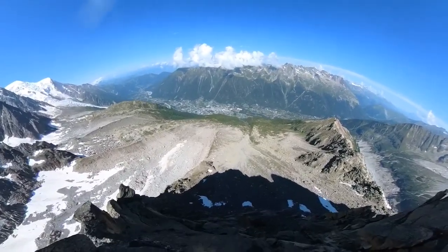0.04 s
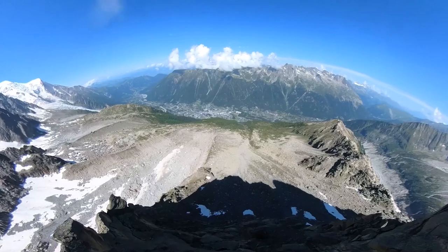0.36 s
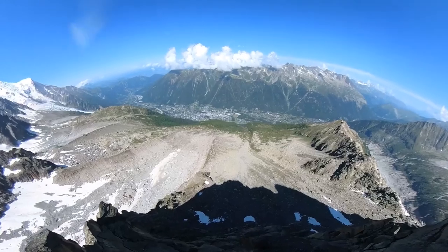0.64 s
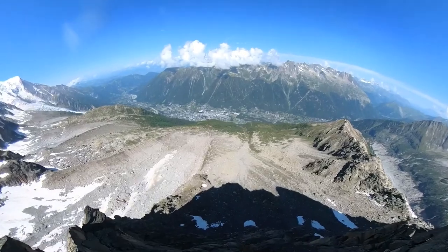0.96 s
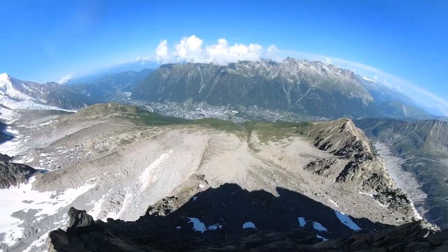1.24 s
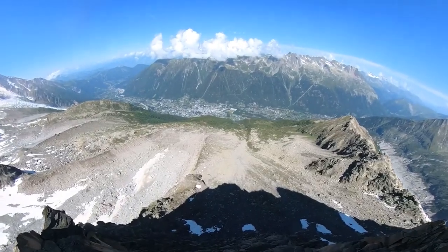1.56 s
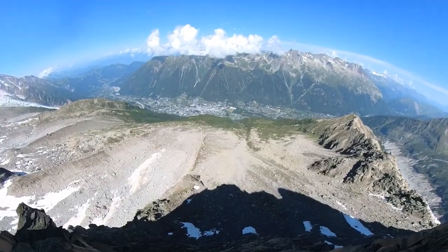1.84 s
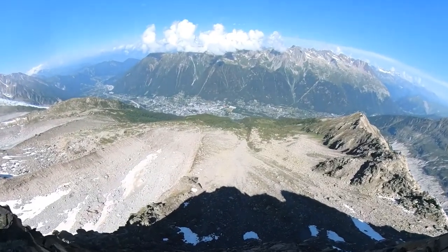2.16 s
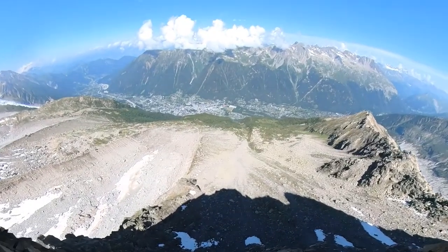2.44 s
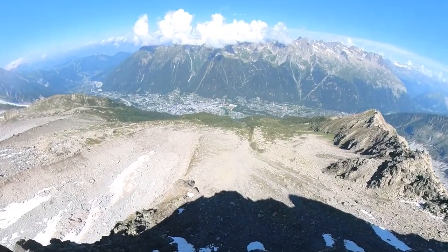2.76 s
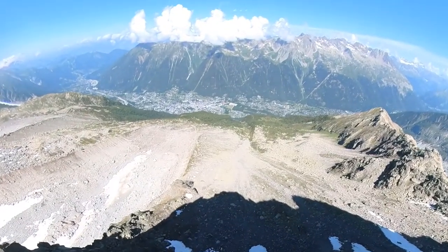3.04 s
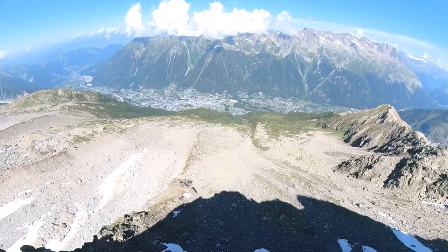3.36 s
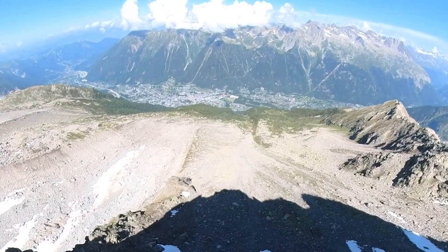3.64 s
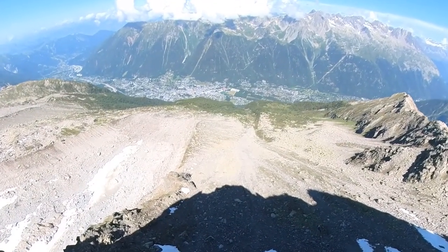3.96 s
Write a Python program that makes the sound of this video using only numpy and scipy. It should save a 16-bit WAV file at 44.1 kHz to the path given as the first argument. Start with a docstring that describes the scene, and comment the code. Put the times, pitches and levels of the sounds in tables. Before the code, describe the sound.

Muffled wind buffets a body-worn microphone in the left channel, with a brief cloth swish and dull thumps. It swells into rushing air as a fall from a mountain gathers speed, ending with a short rasp of gear.

```python
"""Wind rumbles on a muffled microphone, left channel only, as a jumper with a camera leaps off a mountain.
A sleeve swishes and a buckle ticks at the push-off. Turbulent eddies thump on the camera housing,
and the rumble grows into a rush of air as the fall gathers speed. Near the end a piece of gear
rasps against the mount by stick-slip friction, and the treble fades away."""
import sys
import numpy as np
from scipy import signal
from scipy.fft import rfft, irfft, next_fast_len
from scipy.io import wavfile
from scipy.ndimage import uniform_filter1d, map_coordinates

SR = 44100
rng = np.random.default_rng(int(sys.argv[2]) if len(sys.argv) > 2 else 0)


def dump_mix(stems):
    """Bounce the given channels to the path in sys.argv[1] as a 16-bit WAV at rate SR."""
    frames = np.atleast_2d(stems).T  # one column per channel
    limited = np.clip(frames, -1, 1)  # hard clip at full scale
    pcm = np.round(limited * 32767).astype(np.int16)
    wavfile.write(sys.argv[1], SR, pcm)


N = 176400
TIME_S = np.arange(N) / SR


def amp(db):
    """Amplitude ratio of a level in decibels."""
    return 10 ** (np.asarray(db) / 20)


def unit(x):
    """Normalisation to an rms of 1."""
    return x / np.sqrt(np.mean(x ** 2) + 1e-20)


def along(points, hz):
    """Interpolation of a spectrum on a logarithmic frequency axis."""
    frequency_hz, level_db = np.transpose(points)
    return np.interp(np.log(hz + 1), np.log(frequency_hz + 1), level_db)


def curves(rows):
    """Linear interpolation in time: one value per sample for each column after the first."""
    time_s, *columns = np.transpose(rows)
    return [np.interp(TIME_S, time_s, column) for column in columns]


def wobble(knots_per_s):
    """Random modulation: a smooth spline through Gaussian values."""
    return map_coordinates(rng.standard_normal(4096), [TIME_S * knots_per_s], mode="mirror")


def bell(centre_s, width_s):
    """Gaussian envelope, falling from 1 to 1/e at width_s from its centre."""
    return np.exp(-((TIME_S - centre_s) / width_s) ** 2)


def filtered(x, response):
    """Zero-phase filtering: the spectrum of x times a frequency response."""
    size = next_fast_len(N + SR // 2)
    return irfft(rfft(x, size) * response(np.fft.rfftfreq(size, 1 / SR)), size)[:N]


def noise(spectrum):
    """Spectral shaping of white noise, at an rms of 1."""
    return unit(filtered(rng.standard_normal(N), lambda hz: amp(along(spectrum, hz))))


def steadied(x, span_s):
    """Division by the running rms evens out slow chance swells."""
    window = np.hanning(int(span_s * SR) + 3)
    energy = np.abs(signal.fftconvolve(x ** 2, window, "same"))
    weight = signal.fftconvolve(np.ones(N), window, "same")
    return x / np.sqrt(energy / weight + 1e-9)


def through_body(x, spectrum, size=4096):
    """Convolution with a body's minimum-phase impulse response, of unit energy."""
    cepstrum = irfft(np.log(amp(along(spectrum, np.fft.rfftfreq(size, 1 / SR)))))
    cepstrum[1:size // 2] *= 2  # folding the cepstrum makes the response causal
    cepstrum[size // 2 + 1:] = 0
    ring = irfft(np.exp(rfft(cepstrum)))
    return signal.fftconvolve(x, ring / np.linalg.norm(ring))[:N]


def taps(rows):
    """Impulse excitation: one spike for each row of start_s, level_db."""
    start_s, level_db = np.transpose(rows)
    return np.bincount(np.round(start_s * SR).astype(int), amp(level_db), N)


def gritty(knocks, grit_db, t60_s=0.0074, size=512):
    """Each knock shares its energy with an exponentially decaying burst of noise."""
    decay = amp(-60 * np.arange(size) / SR / t60_s)
    envelope = signal.fftconvolve(knocks, decay / np.linalg.norm(decay))[:N]
    grit = envelope * rng.standard_normal(N)
    return (knocks + amp(grit_db) * grit) / np.sqrt(1 + amp(grit_db) ** 2)


def harness():
    """Impulse response: light contacts in the harness sound as faint, bright clicks."""
    # contacts: start_s, level_db
    contacts = [(1.243, -46.5), (1.648, -47.5), (1.711, -49.5), (2.078, -47.5), (3.585, -38)]
    # response of the harness: frequency_hz, relative_db
    response = [(1000, -31.5), (3500, 6), (6500, 2.5), (8000, -9.5), (9500, -22.5)]
    return through_body(taps(contacts), response)


def sleeve(gain_db=29):
    """Friction noise: cloth swishes at the push-off and rustles faintly after it."""
    # strength of the rubbing: time_s, relative_db
    rubbing = [(0.02, -84), (0.276, -85.5), (0.342, -71.5), (0.38, -77.5), (0.43, -70.5), (0.44, -81.5),
               (0.678, -107), (1.258, -90), (1.388, -110), (1.536, -91), (1.8, -103), (2.08, -100),
               (2.3, -108)]
    # spectrum of sliding cloth: frequency_hz, density_db
    spectrum = [(200, 2), (600, 25), (1200, 15), (2300, 9), (5200, 0), (6200, -2.5), (7300, -9.5),
                (8300, -17.5), (9500, -36.5)]
    level_db, = curves(rubbing)
    rustle = noise(spectrum) * amp(1.4 * wobble(200))
    return amp(gain_db + level_db) * unit(rustle)


def buckle(start_s=0.3932, attack_s=0.00056, gain_db=-23.5):
    """Damped free vibration: two modes of the buckle die quickly in one small tick."""
    # modes of the buckle: pitch_hz, relative_db, t60_s
    modes = [(2660, 6, 0.0078), (3080, 2.5, 0.0076)]
    age = np.maximum(TIME_S - start_s, 0)
    ring = sum(amp(db - 60 * age / t60) * np.sin(2 * np.pi * hz * age) for hz, db, t60 in modes)
    return amp(gain_db) * ring * (1 - np.exp(-age / attack_s))


def rasp(gain_db=-15, scrape_db=-28, grit_db=0.5, scatter_periods=0.16, spread_db=0.2):
    """Stick-slip friction: uneven slips knock on the housing and slow to a few single snaps."""
    # stroke of the gear along the mount: time_s, slips_per_s, relative_db
    stroke = [(3.594, 400, -20), (3.601, 400, 1), (3.642, 360, -5.5), (3.648, 300, -7.5), (3.712, 280, -9),
              (3.731, 260, -6), (3.759, 160, -14.5)]
    # closing snaps: start_s, level_db
    last_slips = [(3.754, -2), (3.7635, 0), (3.7745, 3.5), (3.7845, 2), (3.789, -14), (3.7925, 0.5),
                  (3.799, -10)]
    # response of the housing to a slip: frequency_hz, relative_db
    response = [(60, -22), (200, -2), (450, 3.5), (800, -5.5), (1100, -6), (1600, -14.5), (2400, -20.5),
                (3200, -30.5), (4000, -45), (5000, -58), (7200, -45), (9500, -74)]
    slips_per_s, level_db = curves(stroke)
    moving = (TIME_S > stroke[0][0]) & (TIME_S < stroke[-1][0])
    slip_count = np.floor(np.cumsum(slips_per_s) / SR)
    due = np.flatnonzero(np.diff(slip_count))  # samples where evenly paced slips would fall
    scrape = amp(scrape_db) * rng.standard_normal(N)
    shift, strength = rng.standard_normal((2, N))[:, due]
    onsets = np.clip(due + scatter_periods * shift * SR / slips_per_s[due], 0, N - 1).astype(int)
    slips = np.bincount(onsets, amp(spread_db * strength), N)
    vibration = through_body(gritty(slips, grit_db) + scrape, response)
    force = uniform_filter1d(moving * amp(gain_db + level_db), size=64)
    snaps = through_body(gritty(taps(last_slips), grit_db), response)
    return force * steadied(vibration, span_s=0.0092) + snaps


def bumps():
    """Impact excitation: single hard bumps on the housing sound as dull pops."""
    # impacts: start_s, level_db
    impacts = [(.202, -13.5), (.601, -9), (.677, -19.5), (.732, -5), (.924, -16), (1.057, -10),
               (1.254, -8.5), (1.423, -2.5), (1.433, -7), (1.508, -8.5), (2.079, -11), (2.11, -2),
               (2.879, -11), (2.921, -5), (3.835, -18)]
    # response of the housing to a bump: frequency_hz, relative_db
    response = [(100, 0), (450, 12.5), (800, -0.5), (1200, -11.5), (1620, -21), (2000, -46), (3000, -68)]
    return through_body(gritty(taps(impacts), grit_db=-12.5), response)


def thumps(jolts_per_s=500, attack_s=0.0016):
    """Shot noise: each eddy drives the housing with a run of random jolts that dies away."""
    # eddies striking the housing: start_s, decay_s, level_db
    eddies = [(0.42, 0.042, -31.5), (0.527, 0.11, -36.5), (0.596, 0.017, -26), (0.624, 0.009, -27),
              (0.728, 0.079, -43), (0.921, 0.06, -38.5), (1, 0.0071, -24.5), (1.055, .028, -31),
              (1.108, 0.05, -34), (1.182, 0.013, -33.5), (1.246, 0.058, -32.5), (1.344, 0.029, -34),
              (1.387, 0.011, -22), (1.401, 0.047, -29), (1.499, 0.018, -36.5)]
    # response of the housing to a jolt: frequency_hz, relative_db
    response = [(30, -6), (100, 2), (300, 3), (520, -0.5), (750, -11.5), (1100, -22), (1650, -39),
                (2300, -49.5), (3500, -73)]
    push = np.zeros(N)
    for start_s, decay_s, level_db in eddies:
        age = np.maximum(TIME_S - start_s, 0)
        push += amp(level_db) * (1 - np.exp(-age / attack_s)) * bell(start_s, decay_s)
    jolts = (rng.random(N) < jolts_per_s / SR) * rng.choice([-1, 1], N)
    return through_body(push * steadied(jolts, span_s=0.06), response)


def puffs(width_cycles=0.61):
    """Pressure pulses: a large eddy passing the microphone port makes one or two slow swings."""
    # passing eddies: centre_s, pitch_hz, envelope_peak_db
    eddies = [(.175, 131, -13), (0.35, 183, -19), (0.425, 149, -11.5), (0.446, 72.3, -15),
              (0.63, 102, -15.5), (1.152, 236, -15), (1.662, 76.3, -8.5), (2.503, 105, -11.5),
              (3.435, 129, -13)]
    pressure = np.zeros(N)
    for centre_s, pitch_hz, peak_db in eddies:
        swing = np.sin(2 * np.pi * (pitch_hz * (TIME_S - centre_s) + rng.random()))
        pressure += amp(peak_db) * bell(centre_s, width_cycles / pitch_hz) * swing
    return pressure


def buffeting(gain_db=6):
    """Small-scale turbulence: lumpy noise while the fall is slow, later masked by the rush."""
    # strength of the buffeting: time_s, relative_db
    strength = [(0.0, -48.5), (0.19, -43), (0.5, -45), (0.6, -33), (0.67, -55), (0.79, -36.5), (0.84, -48),
                (0.95, -37.5), (1.5, -39), (1.54, -64), (2.26, -38.5), (2.4, -43.5)]
    # pressure spectrum of the smaller eddies: frequency_hz, density_db
    spectrum = [(70, -22), (140, -2), (230, 0.5), (330, -6), (500, -18), (750, -27.5), (1100, -49),
                (3000, -86.5)]
    level_db, = curves(strength)
    lumps = noise(spectrum) * amp(2.0 * wobble(70))
    return amp(gain_db + level_db) * steadied(lumps, span_s=0.079)


def rumble(gain_db=5.5, deep_hz=63, thins_from_s=1.06, thins_db_per_s=3.5):
    """Large-scale turbulence rocks the air at the port; at speed the deepest eddies thin out."""
    # strength of the rumble: time_s, relative_db
    strength = [(0.0, -27.5), (0.08, -37), (0.38, -34.5), (0.53, -28), (0.645, -30.5), (0.68, -35.5),
                (0.81, -31), (1.58, -29), (1.78, -27.5), (2.15, -23), (2.18, -34), (2.26, -22.5),
                (2.36, -30), (3.0, -29), (3.92, -30), (4.0, -23)]
    # pressure spectrum of the large eddies: frequency_hz, density_db
    spectrum = [(15, -36), (25, -12.5), (40, -4.5), (68, -3.5), (100, -7.5), (150, -10.5), (230, -22),
                (400, -41.5), (1000, -95)]
    level_db, = curves(strength)
    air = steadied(noise(spectrum), span_s=0.12)
    deep = filtered(air, lambda hz: 1 / (1 + (hz / deep_hz) ** 6))
    deep_kept = amp(-thins_db_per_s * np.maximum(TIME_S - thins_from_s, 0))
    return amp(gain_db + level_db) * (air - (1 - deep_kept) * deep)


def rush(roar_db=39.5, hiss_db=-30, hiss_db_per_flow_db=0.59, treble_hz=1800):
    """Flow noise grows with airspeed: air roars over the housing and hisses at its edges."""
    # strength of the airflow: time_s, relative_db
    airflow = [(0.93, -101), (1.0, -84.5), (1.1, -88), (1.14, -81.5), (1.28, -87.5), (2.11, -78),
               (2.15, -84), (2.41, -72), (2.82, -64.5)]
    # spectrum of the flow over the housing: frequency_hz, density_db
    roar_spectrum = [(50, -23), (140, 0), (300, -7), (500, -16), (750, -23), (1100, -28.5), (1600, -36),
                     (2500, -43), (3200, -50.5), (4000, -62.5), (5000, -76.5), (9000, -94.5)]
    # spectrum of the flow at the edges: frequency_hz, density_db
    hiss_spectrum = [(3000, -30.5), (5000, -17.5), (6000, -1.5), (7200, 5), (8200, -3), (9000, -21.5),
                     (10000, -36)]
    flow_db, = curves(airflow)
    roar_gain = amp(roar_db + flow_db + 0.23 * wobble(6.7))
    roar = roar_gain * unit(noise(roar_spectrum) * amp(0.69 * wobble(150)))
    onset_db, = curves([(1.7, -15.5), (1.78, 0)])  # the hiss comes in once the fall is under way
    hiss_gain = amp(hiss_db + onset_db + hiss_db_per_flow_db * flow_db + 0.4 * wobble(15))
    hiss = hiss_gain * noise(hiss_spectrum)
    low_roar = filtered(roar, lambda hz: np.exp(-(hz / treble_hz) ** 2))
    lull = amp(-6 * bell(centre_s=3.107, width_s=0.17))  # the treble sinks for a moment
    return low_roar + lull * (roar - low_roar + hiss)


def scene():
    """Superposition of wind, bumps and gear in the left channel; the right is silent."""
    dip = amp(-7.5 * bell(centre_s=3.816, width_s=0.016))  # the wind dips briefly
    wind = dip * (rumble() + puffs() + buffeting() + thumps() + rush())
    contacts = bumps() + sleeve() + buckle() + harness() + rasp()
    return np.array([wind + contacts, np.zeros(N)])


def record(dry, treble_hz=2500, fade_from_s=3.777, fade_db_per_s=92.5, band_limit_hz=9650):
    """Low-pass filtering: the treble fades at the end, and nothing passes above the band limit."""
    fade = amp(-fade_db_per_s * np.maximum(TIME_S - fade_from_s, 0))
    low = np.array([filtered(x, lambda hz: 1 / (1 + (hz / treble_hz) ** 12)) for x in dry])
    dulled = low + fade * (dry - low)
    return np.array([filtered(x, lambda hz: hz < band_limit_hz) for x in dulled])


dry = scene()
out = record(dry)
dump_mix(out)
```